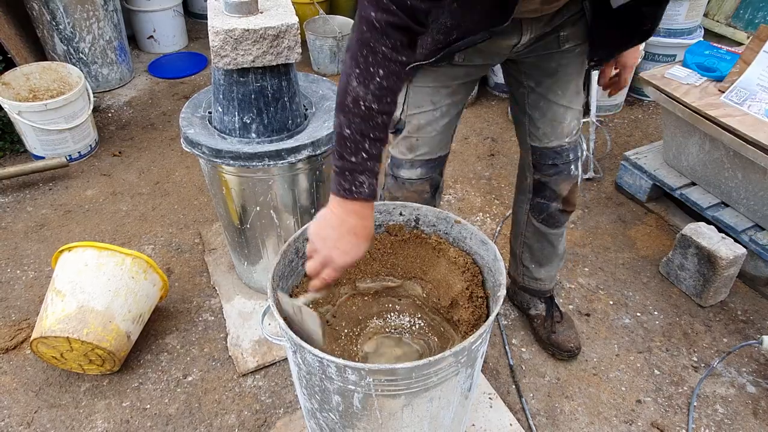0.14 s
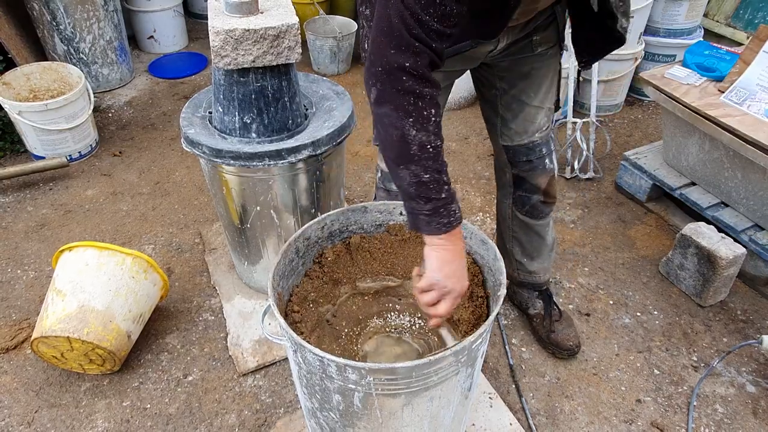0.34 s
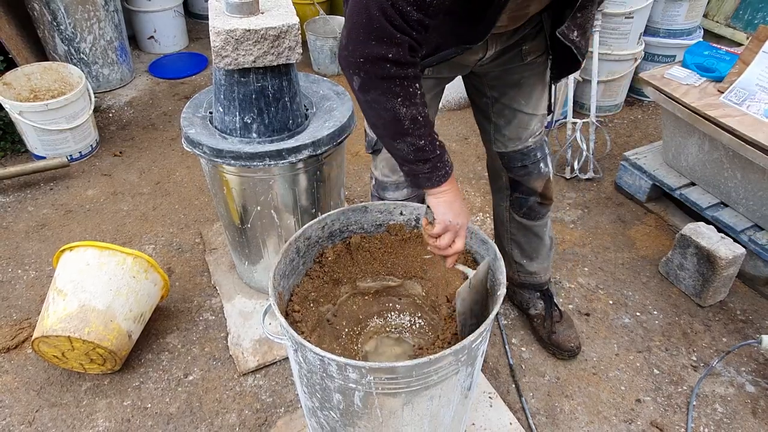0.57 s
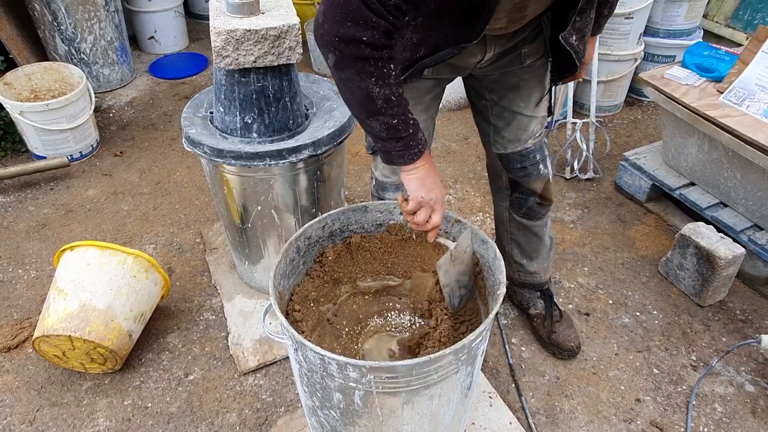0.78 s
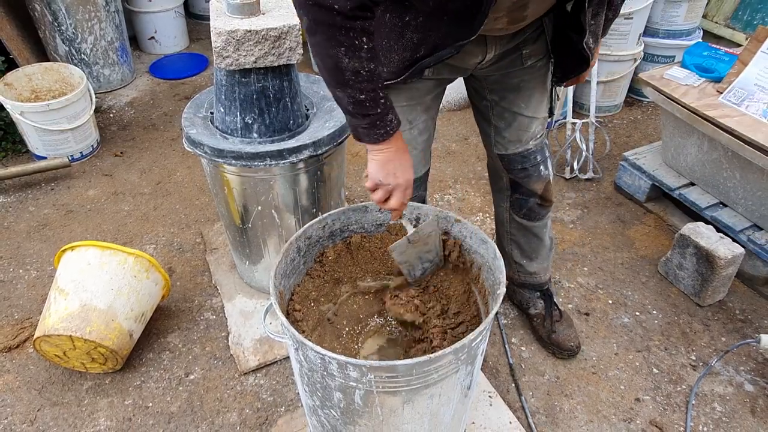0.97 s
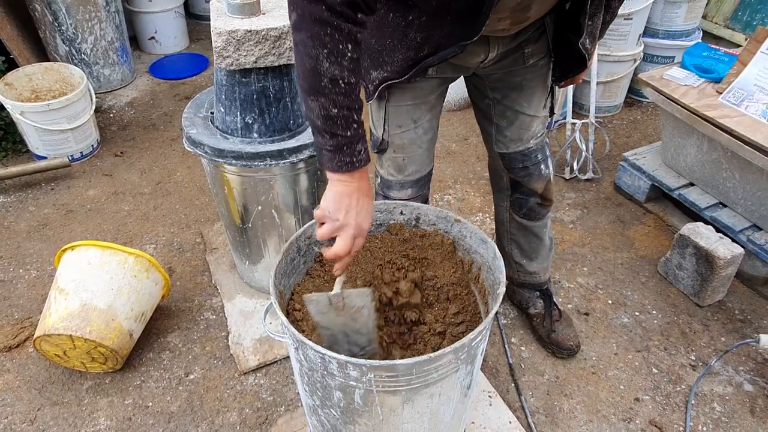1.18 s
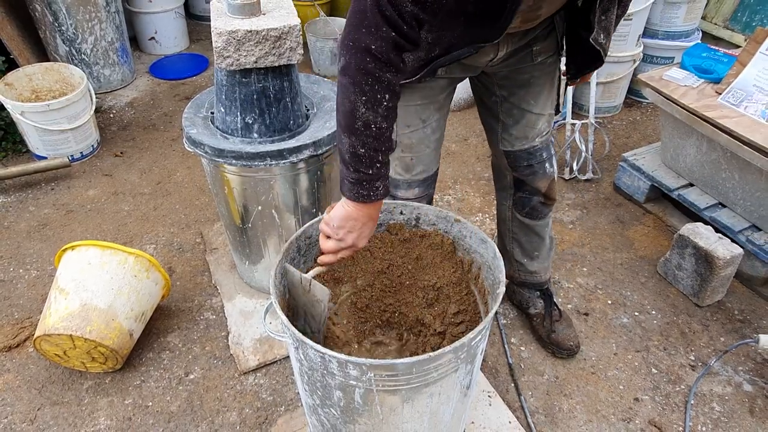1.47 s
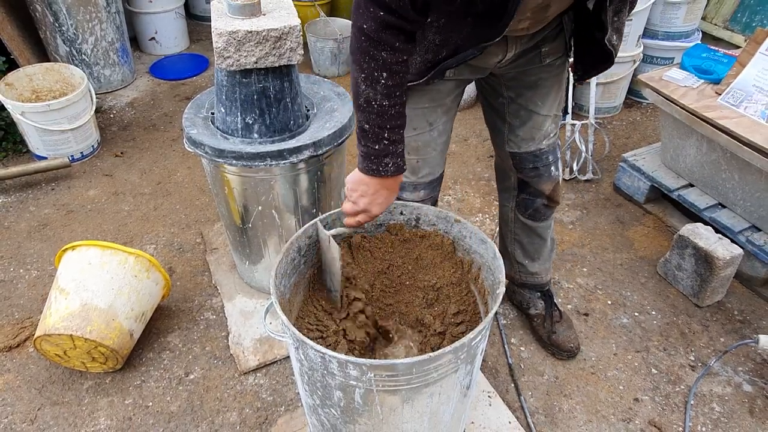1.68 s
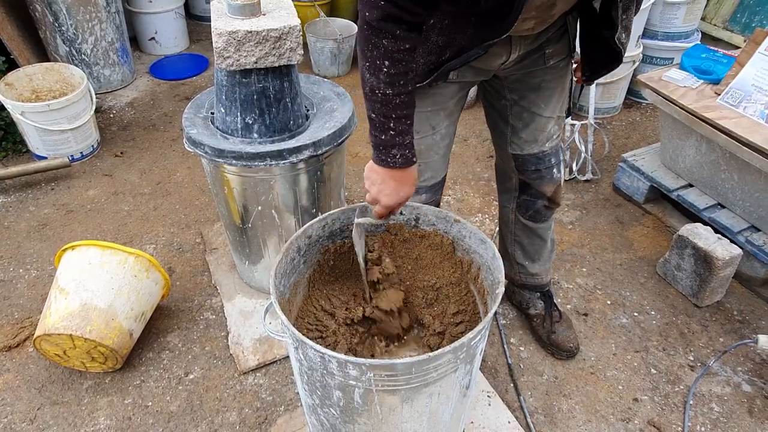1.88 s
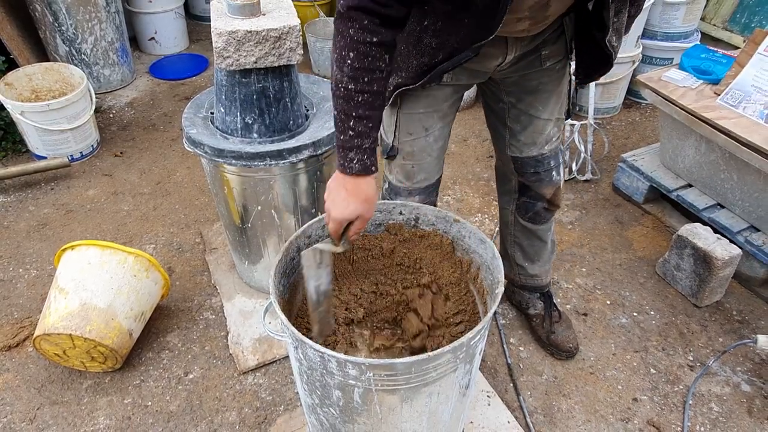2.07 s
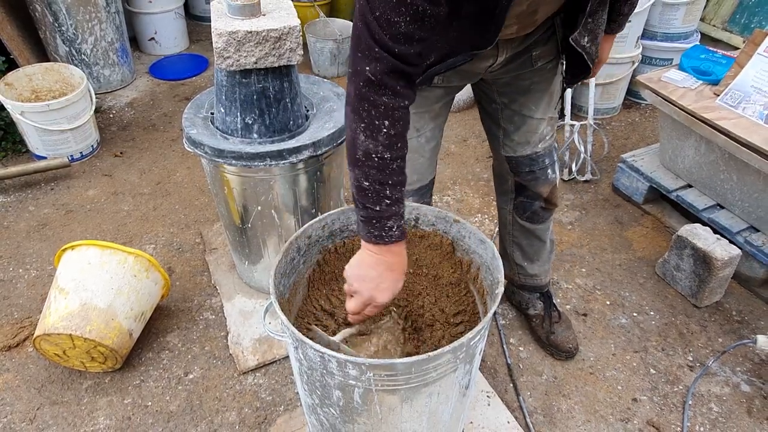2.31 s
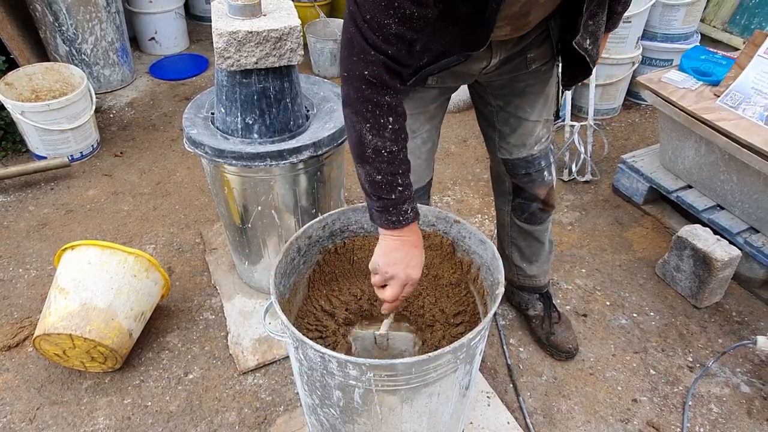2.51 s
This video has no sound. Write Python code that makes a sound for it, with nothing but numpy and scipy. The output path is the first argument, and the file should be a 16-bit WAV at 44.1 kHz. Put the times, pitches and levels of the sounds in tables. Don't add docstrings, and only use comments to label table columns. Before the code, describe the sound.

A small trowel drags harshly along a metal bin through damp sand, with stone snaps and a brief thin squeal, then turns the mix in softer crunches and scrapes again; close, outdoors, faint wind.

```python
import sys
import numpy as np
from scipy import signal
from scipy.io import wavfile
from scipy.ndimage import uniform_filter1d, map_coordinates

SR = 44100
rng = np.random.default_rng(int(sys.argv[2]) if len(sys.argv) > 2 else 0)


def level_to_linear(level):
    exponent = np.asarray(level, float) / 20
    return 10 ** exponent


def unload_wav(signal):
    wavfile.write(
        sys.argv[1],
        SR,
        np.round(np.clip(np.atleast_2d(signal).T, -1, 1) * 32767).astype(np.int16),
    )


N = 116865

# hz, level_db_per_hz
YARD_COLOUR = [(150, -0.5), (700, -6), (1200, -9.5), (3000, -7), (6500, -16), (9000, -14.5), (16000, -31)]
# time_s, level_db
YARD_SWELL = [(0, -2), (1.2, -1), (2.45, 2)]
# hz, level_db_per_hz
WIND_COLOUR = [(20, -12), (45, -11), (65, -4), (100, -9.5), (130, -16), (300, -8.5)]
# time_s, level_db
WIND_GUST = [(0, -52), (.4, -47), (.9, -51), (1.3, -52), (1.7, -45), (2.0, -52), (2.65, -54)]
# start_s, peak_db
DUST_SPITS = [(0.0184, -47), (0.6135, -24), (0.653, -35), (0.6625, -24), (0.6894, -34), (0.7218, -39),
              (0.7407, -31), (0.8051, -33), (0.9752, -45), (1.2511, -40), (1.482, -26.5), (1.5259, -33),
              (1.5509, -27), (1.5964, -40), (1.6067, -31), (1.6911, -39), (1.7649, -45), (1.8437, -36),
              (1.9081, -40), (2.056, -35)]
# peak_s, peak_db, pitch_hz
CLOD_THUDS = [(.074, -32.5, 294), (.084, -32, 607), (.858, -21, 776), (1.11, -33, 794), (1.203, -36.5, 740),
              (1.252, -31.5, 697), (1.266, -27, 280), (1.288, -28.5, 255), (1.31, -25.5, 240),
              (1.043, -37, 774), (.68, -26, 280), (2.051, -23, 770), (2.058, -28, 296), (2.095, -29.5, 266),
              (2.119, -30, 333), (2.153, -31, 760), (2.222, -23, 275)]
# time_s, pressure_db, mortar_load_db, bare_steel_db
TOUCH_STROKES = [
    [(.158, -58, -10.5, 12), (.167, -24, 1.5, 4.5), (.178, -31, -3, 1.5), (.188, -46.5, 5, 19),
     (.209, -46.5, 3, 13)],
    [(2.175, -29.5, 2, 10.5), (2.194, -25, 0, 1), (2.203, -54, -6, 7), (2.217, -25, 7, 1)],
]
# time_s, pressure_db, mortar_load_db, bare_steel_db
SWEEP_STROKES = [
    [(.21, -23.5, -5, -4.5), (.3, -19.5, -5.5, -0.5), (.45, -20, 1, -1), (.465, -21.5, -0.5, -1),
     (.56, -23.5, 1, 5), (.6, -31, 5.5, 5.5), (.66, -31, 0.5, 2), (.73, -31, 2, -1.5), (.82, -35, 2.5, -1),
     (.885, -51.5, 1, 4)],
    [(2.217, -21, 3.5, 0), (2.25, -25, -1.5, 0), (2.34, -24.5, 1.5, 0.5), (2.4, -27.5, -2, -5.5),
     (2.415, -51.5, -3, 6.5), (2.52, -63, -6, -12)],
]
# time_s, pressure_db, mortar_load_db, bare_steel_db
TURN_STROKES = [
    [(1.25, -48, 18, 20.5), (1.345, -43, -1.5, 1.5), (1.356, -30, 7.5, 8.5), (1.445, -31.5, -8.5, -0.5),
     (1.46, -34, 6.5, 3), (1.5, -26, 3.5, -1), (1.59, -34.5, 3, 1), (1.605, -24.5, 11, 6),
     (1.656, -39, -6.5, -8)],
    [(1.656, -33.5, 7, 6.5), (1.78, -26, 3, -0.5), (1.86, -30, 2.5, 1), (1.93, -28.5, 8.5, 4),
     (1.965, -47.5, 5.5, 8), (2.03, -46, 7.5, 8.5), (2.165, -54.5, 15, 15)],
]
# peak_s, peak_db, mortar_load_db, bare_steel_db
EDGE_CATCHES = [(0.309, 2, -27, -32), (0.375, -7, -32, -5), (0.424, 1.5, -22, -26), (0.553, -2.5, 7, -31),
                (0.761, -8, 3, -4), (1.373, -7, -24.5, -14.5), (1.425, -2, 4, -18), (1.474, -2, -1, -10),
                (1.598, -14, -9, 3), (1.626, -9, 5, 5), (1.77, -13, -15, -7), (2.265, 0, 5, 4.5)]
# peak_s, peak_db, mortar_load_db, bare_steel_db
CRUMB_TICKS = [
    (0.9625, -25.5, -0.5, -5),
    (0.9754, -40, -13, -1),
    (1.0077, -33, -2, 3),
    (1.1403, -31.5, 0.5, -2),
    (1.287, -22.5, 4, 0.5),
    (2.055, -30, 12, 14.5),
    (2.1152, -29, 11, 9),
]
# hz, level_db_per_hz
GRIT_COLOUR = [(270, -6), (450, -12), (620, -2), (1500, -3.5), (2500, 7.5), (3700, -1), (7000, -9),
               (16000, -17)]
# pitch_hz, width_hz, level_db
STEEL_MODES = [(280, 61, -5.5), (607, 65, -4), (788, 44, -6), (1146, 174, -4), (1287, 30, -3.5),
               (1801, 190, -10), (2180, 120, -2.5), (2510, 73, -2.5), (2924, 14, -15.5), (3486, 29, -2),
               (4140, 78, -6), (4750, 96, -9.5), (6420, 410, -19.5)]
# hz, likeness_ratio
SCRAPE_LIKENESS = [(200, 0.76), (700, 0.98), (1500, 0.43), (3000, 0.57), (6000, 0.25), (12000, 0.38)]
# time_s, left_over_right_db, left_lag_samples
BLADE_PLACE = [(0.2, 1.7, 0), (0.8, 0.3, 2.5), (1.15, 1.5, -1.5), (1.5, 1, -4), (2.3, 1.6, 1)]
# time_s, pitch_hz, level_db
EDGE_SQUEAL = [(.21, 10900, -80), (.225, 11050, -28), (.265, 10700, -40), (.32, 10000, -30),
               (.37, 10200, -36), (.44, 10500, -69)]
# peak_s, peak_db, pitch_hz
STONE_SNAPS = [(.226, -18, 2810), (.252, -15, 2290), (.308, -9, 2530), (.311, -23, 3980), (.374, -15, 2320),
               (.421, -12.5, 3450), (.48, -17, 1200), (.553, -20, 1269), (.76, -22, 1290),
               (1.369, -23, 2800), (1.468, -23, 2100), (1.481, -25, 1370), (1.499, -24, 2770),
               (1.533, -21.5, 2100), (1.597, -23, 2140), (1.607, -24, 840), (1.611, -28, 2010),
               (1.692, -23, 3260), (1.731, -25, 2480), (1.766, -20.5, 3320), (1.77, -23, 1877),
               (1.785, -29.5, 756), (1.803, -24, 3470), (1.856, -26, 666), (1.872, -37, 2100),
               (1.9, -23, 3080), (2.218, -17.5, 1104), (2.264, -22.5, 1840), (2.266, -22.5, 2500),
               (2.288, -26, 856), (2.307, -27.5, 2470), (2.325, -21.5, 1067), (2.346, -23, 3260),
               (2.372, -29, 2630), (2.392, -27, 1274)]
# start_s, peak_db, pitch_hz
WIND_BUFFETS = [
    (0.348, -29, 71),
    (0.407, -33, 62.6),
    (0.661, -29.5, 82.5),
    (1.191, -36, 49.3),
    (1.5, -30, 59),
    (1.61, -23, 67),
    (1.69, -29.5, 55.7),
    (1.735, -29, 75.6),
]
PORT_GAIN = level_to_linear(-2.25 * np.array([[1], [-1]]))


def in_time(rows):
    s, *columns = np.transpose(rows)
    return [np.interp(np.arange(N) / SR, s, c) for c in columns]


def at_hz(points, hz):
    table = np.array(points)
    return np.interp(np.log(hz), np.log(table[:, 0]), table[:, 1])


def rms_one(x):
    return x / np.sqrt(np.mean(x ** 2) + 1e-20)


def drift(rate_hz):
    r = np.exp(-80 * np.pi * rate_hz / SR)
    white = rng.standard_normal(N // 40 + 2002)
    slow = signal.lfilter([1], [1, -2 * r, r * r], white)[2000:]
    return np.interp(np.arange(N) / 40, np.arange(len(slow)), rms_one(slow))


def resonance(x, hz, width_hz):
    r = np.exp(-np.pi * width_hz / SR)
    zeros = np.array([1, 0, -1]) * (1 - r * r) / 2
    return signal.lfilter(zeros, [1, -2 * r * np.cos(2 * np.pi * hz / SR), r * r], x)


def bands(first_octave, last_octave):
    edges = 20 * 2 ** np.arange(first_octave, last_octave, .5)
    return [(np.sqrt(a * b), signal.butter(2, [a, b], "band", fs=SR, output="sos"))
            for a, b in zip(edges, edges[1:])]


def pair(mid, side, likeness):
    likeness = np.clip(likeness, -1, 1)
    apart = np.sqrt((1 - likeness) / 2) * side * np.array([[1], [-1]])
    return np.sqrt((1 + likeness) / 2) * mid + apart


def hiss(colour, filters, likeness, patchy_db, rate_hz):
    white = rng.standard_normal((2, 2, N))
    out = 0
    for k, (hz, sos) in enumerate(filters):
        gain = level_to_linear(at_hz(colour, hz) + patchy_db * drift(rate_hz))
        out = out + gain * pair(*signal.sosfilt(sos, white[k % 2]), likeness)
    return rms_one(out)


def clicks(rate_hz, spread_db):
    sizes = level_to_linear(spread_db * np.minimum(rng.exponential(1, (2, 2, N)), 4))
    signs = rng.choice([-1, 1], (2, 2, N))
    return rms_one(sizes * signs * (rng.random((2, 2, N)) < rate_hz / SR))


def yard():
    swell_db, = in_time(YARD_SWELL)
    return level_to_linear(-51.5 + swell_db) * hiss(YARD_COLOUR, bands(2.876, 10.1), 0.37, patchy_db=4.0, rate_hz=38)


def wind():
    thrum_hz, thrum_width_hz, thrum_db = 64, 26, -5.5
    gust_db, = in_time(WIND_GUST)
    lumps = hiss(WIND_COLOUR, bands(0, 4), 0.3, patchy_db=2.5, rate_hz=7.8)
    both = lumps + level_to_linear(thrum_db) * rms_one(resonance(lumps, thrum_hz, thrum_width_hz))
    slow = np.sqrt(uniform_filter1d(both ** 2, size=SR // 5))
    return level_to_linear(gust_db) * both / slow * PORT_GAIN


def spits():
    from_hz, t60_s, gain_db, likeness = 10400, 0.038, -1, 0.44
    force, t = np.zeros(N + SR), np.arange(SR // 16) / SR
    for s, db in DUST_SPITS:
        rise = np.minimum(t * 1000, 1)
        force[int(s * SR):][:len(t)] += level_to_linear(db + gain_db - 60 * t / t60_s) * rise
    noise = pair(*rng.standard_normal((2, N)), likeness)
    high = signal.butter(3, from_hz, "high", fs=SR, output="sos")
    return signal.sosfilt(high, noise * force[:N] * level_to_linear([[1.5], [-1.5]]))


def thuds():
    cycles, rise_s, gain_db, rough = 13, 0.00333, 0.5, 0.21
    out, t = np.zeros(N + SR), np.arange(SR // 8) / SR
    for s, db, hz in CLOD_THUDS:
        sand = rms_one(resonance(resonance(rng.standard_normal(len(t)), hz, hz), hz, hz))
        rise = np.sin(np.minimum(t / rise_s, 1) * np.pi / 2) ** 2
        shape = rise * level_to_linear(db + gain_db - 60 * t * hz / cycles)
        i = int((s - rise_s) * SR)
        out[i:i + len(t)] += shape * (np.sin(2 * np.pi * hz * t) + rough * sand)
    return out[:N]


def contact():
    t = np.arange(N) / SR
    total = np.zeros((3, N)) + [[1e-12], [0], [0]]
    chatter_db = 2.5 * drift(70)
    for rows in TOUCH_STROKES + SWEEP_STROKES + TURN_STROKES:
        db, load, steel = in_time(rows)
        touching = (t >= rows[0][0]) * (t < rows[-1][0])
        total += level_to_linear(2 * (db + chatter_db)) * touching * np.array([np.ones(N), load, steel])
    # rise_s, t60_s, gain_db
    for rows, rise_s, t60_s, gain_db in ((EDGE_CATCHES, 0.0026, 0.053, -16.5), (CRUMB_TICKS, 0.0012, .05, -3)):
        for s, db, load, steel in rows:
            i = int((s - rise_s) * SR)
            age = t[:min(N - i, SR // 8)]
            blow = np.minimum(age / rise_s, 1) * level_to_linear(db + gain_db - 60 * age / t60_s)
            total[:, i:i + len(age)] += blow ** 2 * np.array([[1], [load], [steel]])
    return np.sqrt(total[0]), total[1] / total[0], total[2] / total[0]


def trowel():
    load_pivot_hz, steel_from_hz = 1685, 3920
    pebble_q, pebble_db, mode_gain_db = 42, 6, 9.5
    force, load, steel = contact()
    grains = clicks(3000, spread_db=3)
    pebbles = clicks(6000, spread_db=3.3)[0]

    def lean_db(hz):
        low = load * np.tanh(np.log2(load_pivot_hz / hz))
        return low + steel * np.clip(np.log2(hz / steel_from_hz) + .5, 0, 1)

    out, power = 0, 0
    for k, (hz, sos) in enumerate(bands(3, 10.1)):
        gain_db = at_hz(GRIT_COLOUR, hz)
        drive = grains[k % 2] * force * level_to_linear(gain_db + lean_db(hz) + 1.5 * drift(39.0))
        out = out + pair(*signal.sosfilt(sos, drive), at_hz(SCRAPE_LIKENESS, hz))
        power += level_to_linear(2 * gain_db) * hz * .7 / SR

    pitches_hz = np.geomspace(400, 15500, 48)
    dealt = rng.integers(0, len(pitches_hz), (2, N))
    for k, hz in enumerate(pitches_hz):
        gain_db = at_hz(GRIT_COLOUR, hz) + pebble_db
        struck = pebbles * (dealt == k) * np.sqrt(len(pitches_hz))
        drive = struck * force * level_to_linear(gain_db + lean_db(hz)) + 1e-18
        out = out + pair(*resonance(drive, hz, hz / pebble_q), at_hz(SCRAPE_LIKENESS, hz))
        power += level_to_linear(2 * gain_db) * hz / pebble_q * np.pi / SR

    for k, (hz, width_hz, db) in enumerate(STEEL_MODES):
        gain_db = db + mode_gain_db
        drive = grains[k % 2] * force * level_to_linear(gain_db + lean_db(hz) + 3.5 * drift(13.0))
        out = out + (-1) ** k * pair(*resonance(drive, hz, width_hz), at_hz(SCRAPE_LIKENESS, hz))
        power += level_to_linear(2 * gain_db) * width_hz * np.pi / SR

    out = out / np.sqrt(power) + squeal() + stones()
    pan_db, lag = in_time(BLADE_PLACE)
    left = map_coordinates(out[0], [np.arange(N) - lag], order=3, mode="nearest")
    return np.array([left * level_to_linear(pan_db / 2), out[1] * level_to_linear(-pan_db / 2)])


def squeal():
    width_hz = 400
    hz, db = in_time(EDGE_SQUEAL)
    low = signal.butter(2, width_hz / 2, fs=SR, output="sos")
    slow = rms_one(signal.sosfilt(low, rng.standard_normal((2, 2, N))))
    turn = 2 * np.pi * np.cumsum(hz) / SR
    return level_to_linear(db) * (slow[0] * np.cos(turn) + slow[1] * np.sin(turn))


def stones():
    rise_s, t60_s, rough, gain_db = 0.00119, 0.092, 0.44, -1.5
    out, t = np.zeros((2, N + SR)), np.arange(SR // 8) / SR
    for s, db, hz in STONE_SNAPS:
        sand = rms_one(resonance(rng.standard_normal((2, len(t))), hz, hz / 8))
        shape = np.minimum(t / rise_s, 1) * level_to_linear(db + gain_db - 60 * t / t60_s)
        i = int((s - rise_s) * SR)
        out[:, i:i + len(t)] += shape * (np.sin(2 * np.pi * hz * t) + rough * sand)
    return out[:, :N]


def buffets():
    cycles, lag_rad = 2.6, np.array([[0], [1.6]])
    out, t = np.zeros((2, N)), np.arange(N) / SR
    for s, db, hz in WIND_BUFFETS:
        swell = np.sin(np.pi * np.clip((t - s) * hz / cycles, 0, 1)) ** 2
        out += level_to_linear(db) * swell * np.sin(2 * np.pi * hz * (t - s) - lag_rad)
    return out * PORT_GAIN


def scene():
    return yard() + wind() + spits() + thuds() + trowel() + buffets()


def roll_off(x):
    return signal.sosfilt(signal.butter(12, 17010, fs=SR, output="sos"), x)


def record(dry):
    limit, dip_hz, dip_width_hz, dip_depth, cutoff_hz = .85, 8220, 2960, 0.66, 15740
    dry = limit * np.tanh(dry / limit)
    x = dry - dip_depth * resonance(dry, dip_hz, dip_width_hz)
    x = signal.sosfilt(signal.ellip(16, .5, 48, cutoff_hz, fs=SR, output="sos"), x)
    return roll_off(x)


dry = scene()
out = record(dry)
unload_wav(out)
```